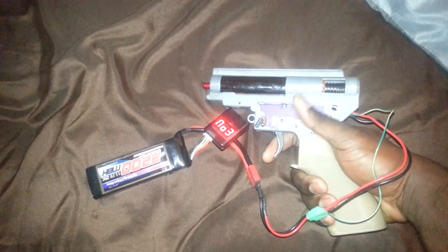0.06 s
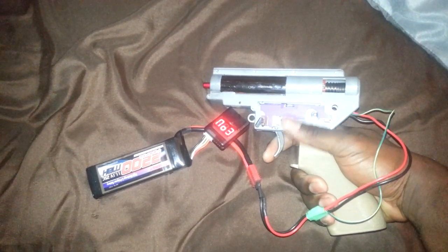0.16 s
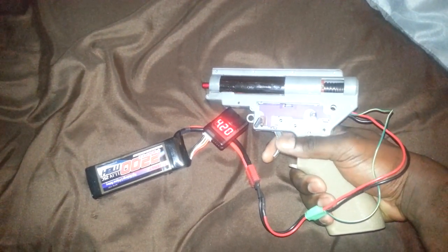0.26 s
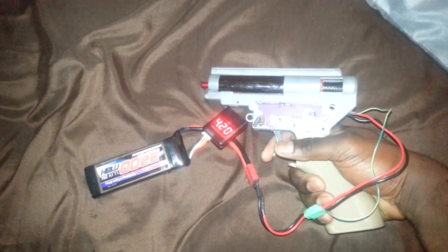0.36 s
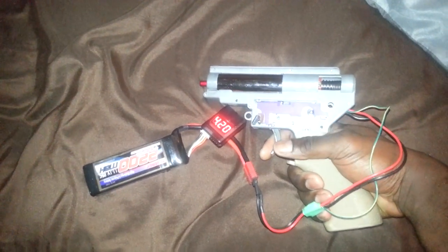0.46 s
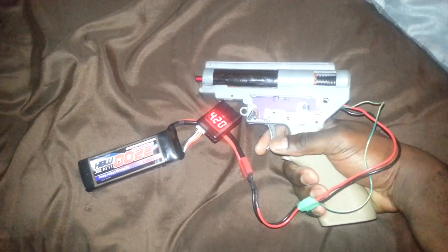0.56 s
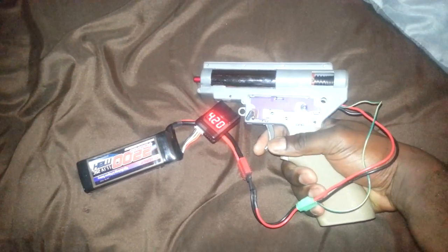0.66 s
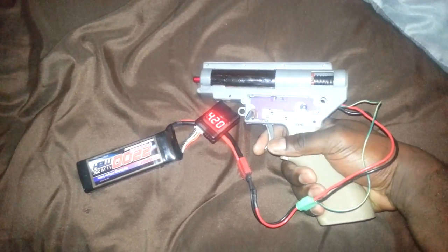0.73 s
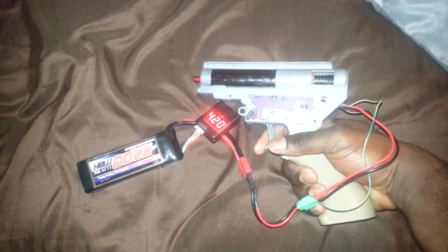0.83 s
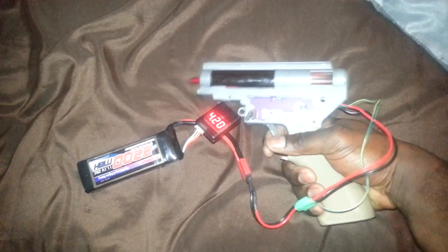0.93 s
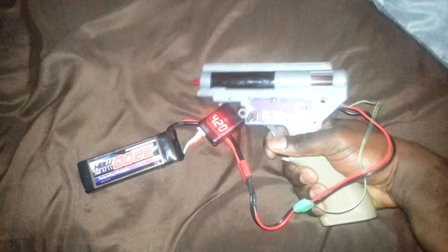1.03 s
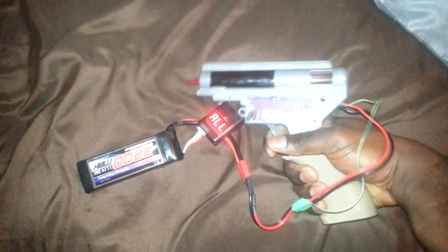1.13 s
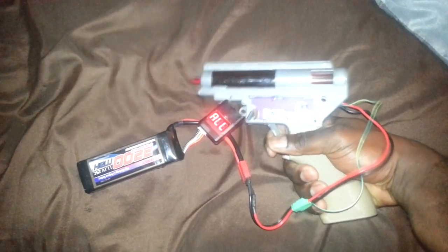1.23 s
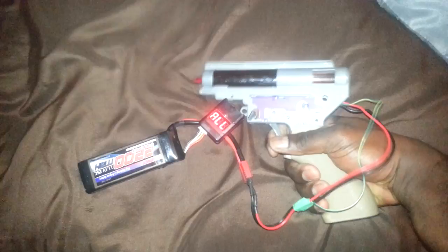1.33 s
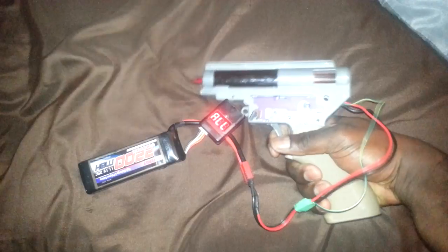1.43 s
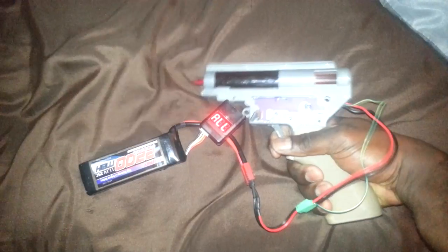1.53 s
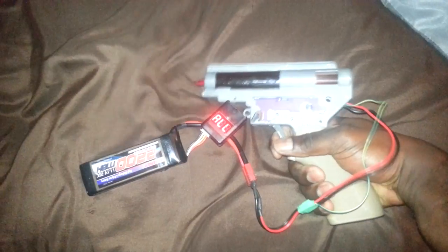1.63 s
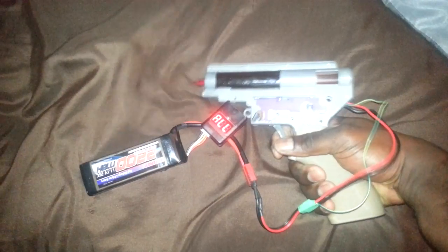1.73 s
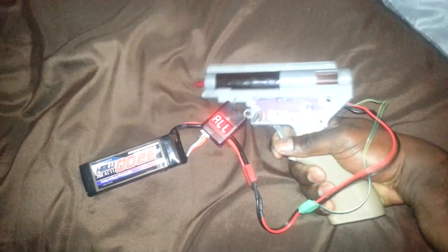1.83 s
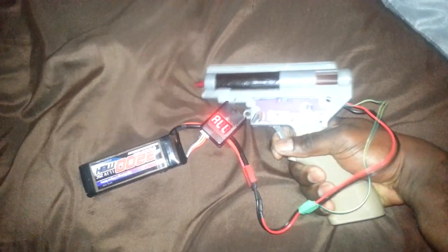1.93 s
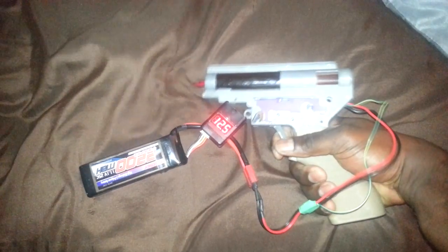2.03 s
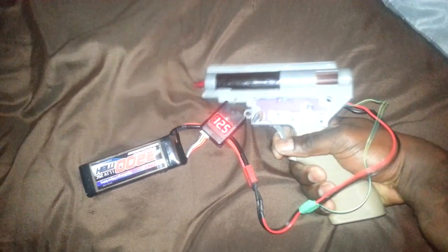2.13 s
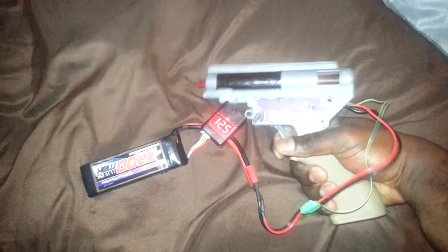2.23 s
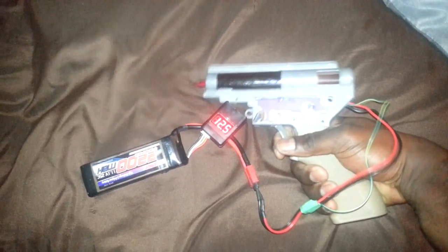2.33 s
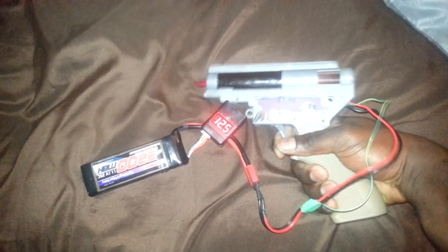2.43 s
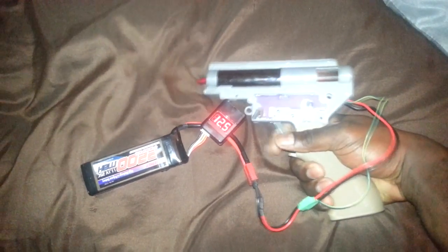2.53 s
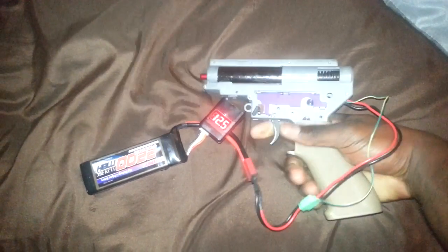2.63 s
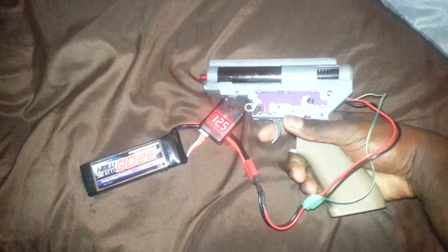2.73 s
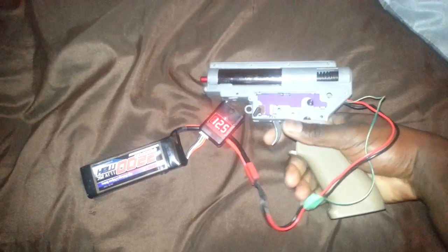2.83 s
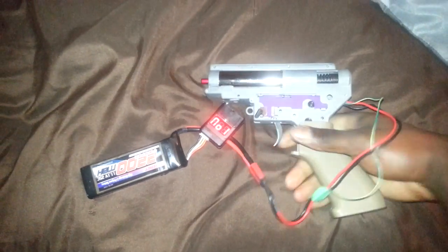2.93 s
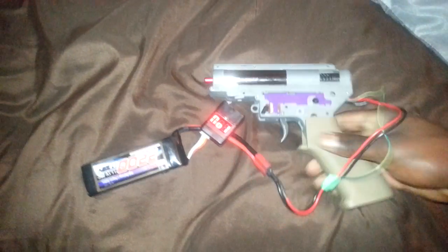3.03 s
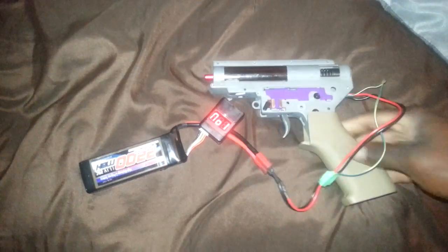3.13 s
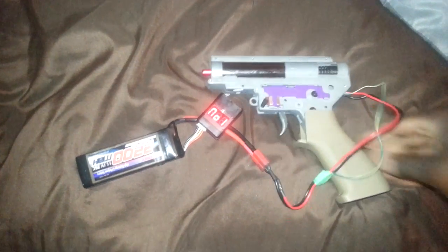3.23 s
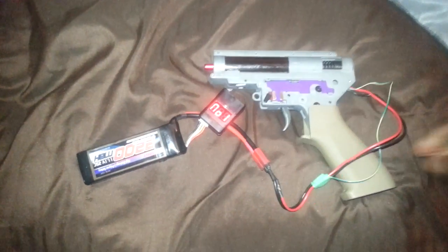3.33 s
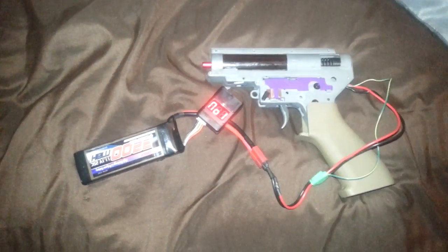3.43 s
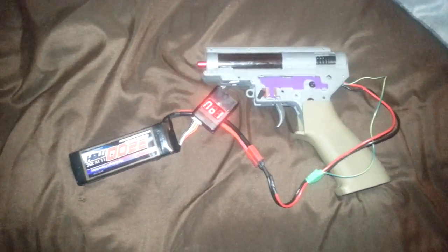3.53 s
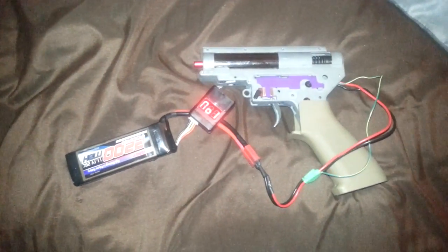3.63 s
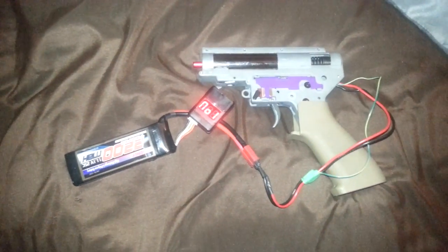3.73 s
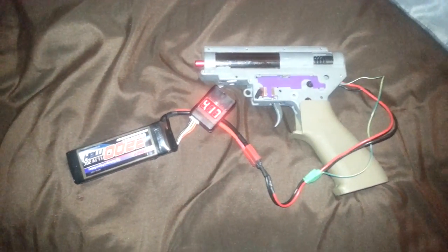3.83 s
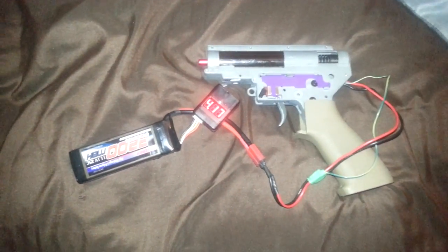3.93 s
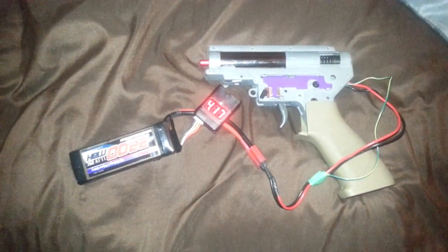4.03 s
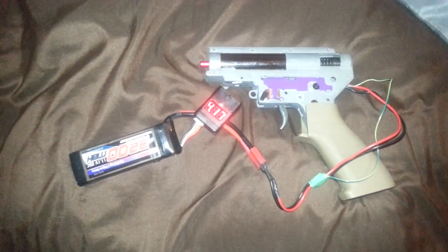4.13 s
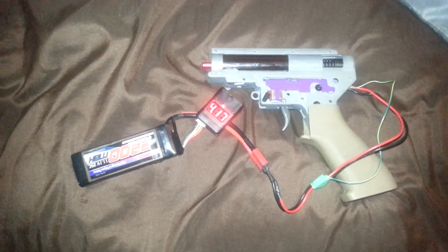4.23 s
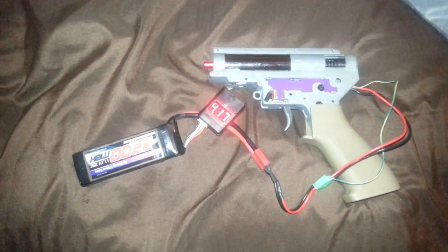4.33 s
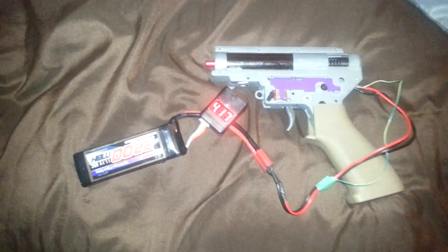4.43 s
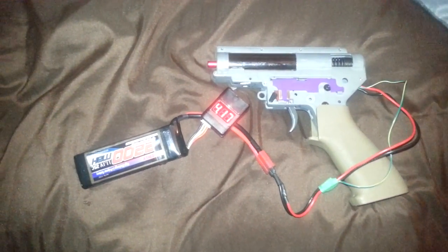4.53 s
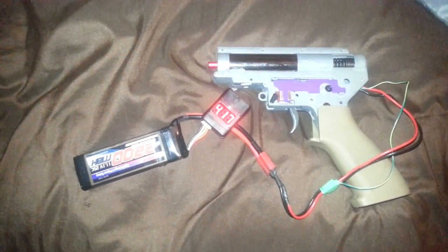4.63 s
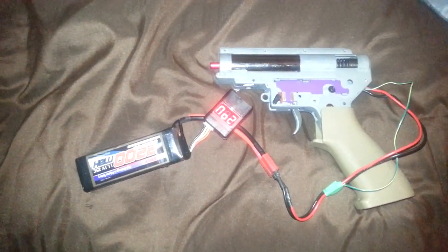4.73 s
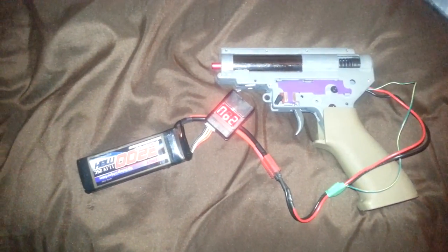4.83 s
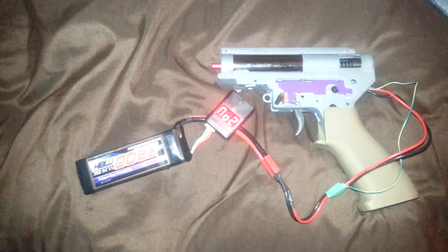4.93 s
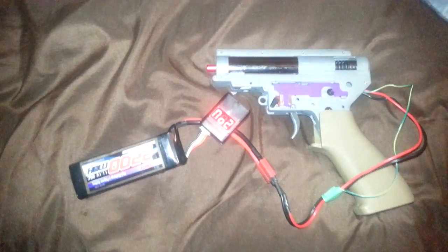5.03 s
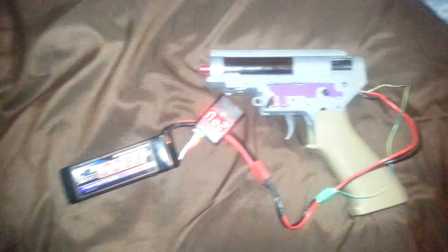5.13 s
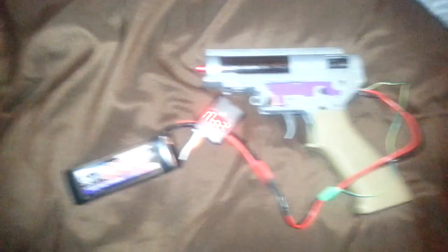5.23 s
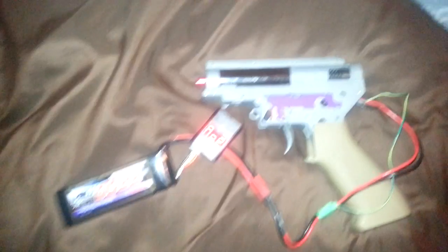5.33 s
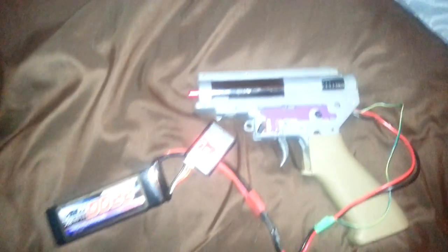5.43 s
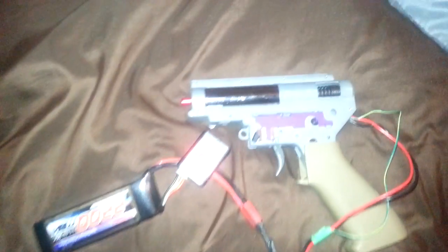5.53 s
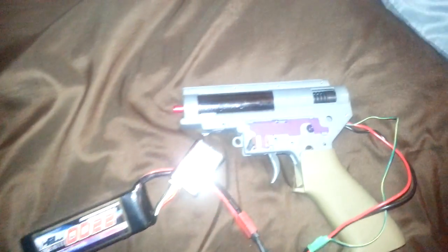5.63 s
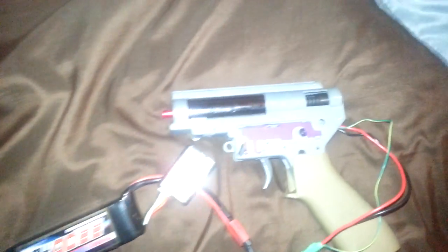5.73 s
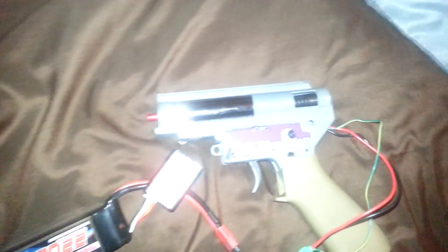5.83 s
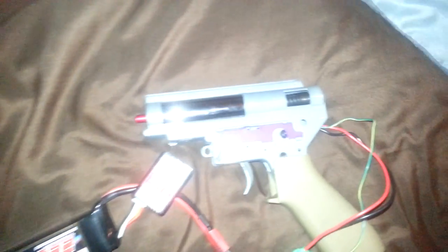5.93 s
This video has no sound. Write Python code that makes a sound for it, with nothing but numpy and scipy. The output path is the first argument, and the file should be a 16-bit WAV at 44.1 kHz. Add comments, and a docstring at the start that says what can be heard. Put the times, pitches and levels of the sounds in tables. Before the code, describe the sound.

Harsh rapid motor-and-piston chatter for under two seconds, overloading a close microphone, followed by faint hand friction and sharp handling clicks.

```python
"""Bedroom: a bare airsoft gearbox on the bed fires one dry burst, about 27 shots/s, overloading the microphone.
The motor surges, then grinds the gears round, slowly sagging; gear teeth and loose parts excite resonances.
Once a turn the piston slams and rings the metal shell; after power-off friction stops the gears.
A hand slides away over cloth (grainy hiss); later fingers rub and click on the camera by its microphones.
A steady noise floor and a soft low rush that comes and goes lie behind."""
import sys
import numpy as np
from scipy import signal
from scipy.fft import rfft, irfft, next_fast_len
from scipy.io import wavfile
from scipy.ndimage import uniform_filter1d

SR = 44100
rng = np.random.default_rng(int(sys.argv[2]) if len(sys.argv) > 2 else 0)


def to_wav(s):
    """Save 16-bit WAV."""
    ch = np.atleast_2d(s).T  # columns
    pcm = np.round(np.clip(ch, -1, 1) * 32767)  # PCM
    wavfile.write(sys.argv[1], SR, pcm.astype(np.int16))


N = 263409
TIME = np.arange(N) / SR


def from_db(db):
    """Decibels to gain."""
    return 10 ** (np.asarray(db) / 20)


def rms_one(x):
    """Scale to rms 1."""
    return x / np.sqrt(np.mean(x ** 2) + 1e-20)


def stereo_gain(left_db, right_db):
    """Column of left and right gains."""
    return from_db([[left_db], [right_db]])


def level(strokes):
    """Gain of overlapping strokes: linear rise, hold, exponential decay; powers add."""
    power = np.zeros(N)
    for start_s, attack_s, hold_s, release_s, level_db in strokes:
        age_s = TIME - start_s
        rise = np.clip(age_s / attack_s, 0, 1)
        decay = np.exp(-np.maximum(age_s - attack_s - hold_s, 0) / release_s)
        power += (from_db(level_db) * rise * decay) ** 2
    return np.sqrt(power)


def at_hz(points, hz):
    """Interpolate a table on a log-frequency axis."""
    table_hz, value = np.transpose(points)
    return np.interp(np.log(hz + 1), np.log(table_hz), value)


def cut(x, hz, kind, order=2):
    """Butterworth low- or high-pass."""
    sos = signal.butter(order, min(hz, .45 * SR), kind, fs=SR, output="sos")
    return signal.sosfilt(sos, x + 1e-18)


def ring(clicks, hz, t60_s):
    """Mode: a unit click starts a decaying sine of initial height 1."""
    radius = np.exp(-np.log(1000) / (t60_s * SR))
    angle = 2 * np.pi * hz / SR
    return signal.lfilter([0, np.sin(angle)], [1, -2 * radius * np.cos(angle), radius ** 2], clicks + 1e-18)


def resonate(x, hz, width_hz):
    """Resonance that keeps the power of white noise."""
    radius = np.exp(-np.pi * width_hz / SR)
    angle = 2 * np.pi * hz / SR
    gain = np.sqrt((1 - radius ** 2) / 2)
    return signal.lfilter(gain * np.array([1, 0, -1]), [1, -2 * radius * np.cos(angle), radius ** 2], x + 1e-18)


def strikes(times_s, sizes):
    """Train of single-sample clicks."""
    return np.bincount(np.round(np.asarray(times_s) * SR).astype(int), sizes, N)[:N]


def fade(clicks, decay_s):
    """Each click becomes an exponential envelope."""
    return signal.lfilter([1], [1, -np.exp(-1 / (decay_s * SR))], clicks + 1e-18)


# left-right correlation: freq_hz, correlation (0-1)
CORRELATION = [(40, 0.01), (150, 0.03), (500, 0.8), (1500, 0), (5000, .05)]


def noise(colour):
    """Coloured stereo noise, rms 1; a shared part gives each frequency its left-right correlation."""
    size = next_fast_len(N)
    hz = np.arange(size // 2 + 1) * SR / size
    shared, *own = rfft(rng.standard_normal((3, size)))
    alike = np.clip(at_hz(CORRELATION, hz), 0, 1)
    spectrum = np.sqrt(alike) * shared + np.sqrt(1 - alike) * np.array(own)
    return rms_one(irfft(spectrum * from_db(at_hz(colour, hz)), size)[:, :N])


# steady background spectrum: freq_hz, relative_level_db
FLOOR_COLOUR = [(30, -2.5), (60, -1), (105, 1), (170, -1.5), (230, -7.5), (690, -22), (1000, -20),
                (2000, -21.5), (5000, -26), (8000, -26.5), (13500, -22.5), (15000, -31.5)]


def floor(level_db):
    """Steady coloured noise of the room background."""
    return from_db(level_db) * noise(FLOOR_COLOUR)


# low rush swells: start_s, hold_s, level_db
RUSH_SWELLS = [(.36, 0.77, -62), (2.8, .35, -53.5), (3.85, 0.46, -58), (4.492, 0.32, -62.5),
               (5.3, 0.48, -59.5)]
# low rush spectrum: freq_hz, relative_level_db
RUSH_SPECTRUM = [(120, -17), (220, -4), (400, -1), (600, -8), (1000, -15.5), (2500, -20), (5000, -25),
                 (12000, -37.5)]
RUSH_ATTACK_S, RUSH_RELEASE_S, RUSH_REST_DB = .12, .2, -68


def rush():
    """Low noise swelling out of a faint resting level."""
    strokes = [(start_s, RUSH_ATTACK_S, hold_s, RUSH_RELEASE_S, level_db)
               for start_s, hold_s, level_db in RUSH_SWELLS]
    return np.hypot(level(strokes), from_db(RUSH_REST_DB)) * noise(RUSH_SPECTRUM)


def grainy_noise(strokes, colour, left_db, right_db, grain_db):
    """Shaped noise made grainy by fast level changes; friction slips in tiny steps like this."""
    grain = from_db(grain_db * rms_one(uniform_filter1d(rng.standard_normal(N), size=90)))
    return level(strokes) * rms_one(grain) * noise(colour) * stereo_gain(left_db, right_db)


# hand leaving over cloth: start_s, attack_s, hold_s, release_s, level_db (before channel trim)
CLOTH_STROKES = [(2.78, 0.12, 0.039, 0.2, -49.5), (3.02, 0.037, .012, 0.032, -49.5),
                 (3.14, 0.034, 0.0089, 0.052, -50)]
# cloth spectrum: freq_hz, relative_level_db
CLOTH_SPECTRUM = [(120, -31), (200, -10), (368, -4), (432, -16), (481, -12), (753, -10), (2550, -14),
                  (3650, -7.5), (5920, -17), (14500, -26)]


def cloth():
    """Hand slides away over the cloth in three grainy friction strokes."""
    return grainy_noise(CLOTH_STROKES, CLOTH_SPECTRUM, left_db=0.0, right_db=-0.5, grain_db=1.0)


# finger by left microphone: start_s, attack_s, hold_s, release_s, level_db (before channel trim)
SLIDE_STROKES = [(4.794, 0.015, 0.13, 0.04, -39.5)]
# slide spectrum: freq_hz, relative_level_db
SLIDE_SPECTRUM = [(180, -49), (300, -17), (353, -15), (415, -25), (450, -14), (480, -27), (512, -15),
                  (1880, -9.5), (3150, 1.5), (6340, -10), (14500, -18.5)]


def finger_slide():
    """Finger friction by the left microphone, smooth hiss."""
    return grainy_noise(SLIDE_STROKES, SLIDE_SPECTRUM, left_db=-0.5, right_db=-17, grain_db=0.0)


# finger by right microphone, light contact then three pushes:
# start_s, attack_s, hold_s, release_s, level_db (before channel trim)
SHIFT_STROKES = [(5.18, 0.032, 0.13, .02, -48), (5.254, 0.0093, 0.0036, 0.0086, -30.5),
                 (5.289, 0.007, .002, 0.0072, -33), (5.312, 0.0087, 0.0012, 0.0036, -26.5)]
# shift spectrum: freq_hz, relative_level_db
SHIFT_SPECTRUM = [(180, -60), (300, -14), (997, -12), (2140, -12), (3050, -4), (5940, -15.5), (7450, -15.5),
                  (14500, -22)]


def finger_shift():
    """Finger friction by the right microphone, slightly grainy."""
    return grainy_noise(SHIFT_STROKES, SHIFT_SPECTRUM, left_db=-5, right_db=-0.5, grain_db=-0.5)


# finger clicks on the camera: start_s, right_peak_db (before thud), ring_hz, scratch_decay_s, thud_re_peak_db
FINGER_CLICKS = [(5.1555, -34, 4200, .0004, -24), (5.164, -25, 3330, 0.00036, -25),
                 (5.203, -21, 3270, 0.0019, -34), (5.213, -34, 3400, .001, -14),
                 (5.243, -38, 3000, .001, 4), (5.2865, -3, 5000, 0.00055, -47),
                 (5.2974, -8, 4070, 0.00052, -42), (5.3146, -7.5, 2660, 0.001, -17.5),
                 (5.3231, -2, 3550, .0005, -25)]


def finger_clicks(left_db, width_hz, snap, thud_hz, dull_hz):
    """Each slip is a snap with a short scratch, ringing the camera case over a dull thud."""
    out = np.zeros((2, N))
    for start_s, peak_db, ring_hz, scratch_s, thud_db in FINGER_CLICKS:
        hit = strikes([start_s], [1.])
        drive = hit + 0.39 * fade(hit, scratch_s) * rng.standard_normal((2, N))
        bright = snap * cut(drive, ring_hz, "high")
        click = cut(resonate(drive, ring_hz, width_hz) + bright, dull_hz, "low")
        click /= np.abs(click).max(axis=1, keepdims=True)
        thud = from_db(thud_db) * ring(hit, thud_hz, 0.011)
        out += from_db(peak_db) * (click * stereo_gain(left_db, 0) + thud)
    return out


BED_T60_S = 0.6


def bedroom(x, wet_db, centre_hz, width_hz):
    """Reverb: decaying mid-band noise tail, different at each microphone."""
    t = TIME[:SR // 2]
    tail = rng.standard_normal((2, len(t))) * np.exp(-np.log(1000) * t / BED_T60_S) * (t > .008)
    tail = cut(resonate(tail, centre_hz, width_hz), centre_hz / 2, "high")
    tail /= np.sqrt(np.sum(tail ** 2, axis=1, keepdims=True))
    return from_db(wet_db) * signal.fftconvolve(x, tail, axes=1)[:, :N]


# low burst at motor start: start_s, attack_s, hold_s, release_s, level_db (before channel trim)
START_BURST = [(.969, 0.012, 0.039, .045, -21)]
# start burst spectrum: freq_hz, relative_level_db
START_BURST_SPECTRUM = [(30, 11), (100, -5.5), (400, 0), (900, 0.5), (1600, -14.5), (6000, -36)]


def start_burst():
    """One short burst of low noise as the motor starts."""
    return grainy_noise(START_BURST, START_BURST_SPECTRUM, left_db=0.0, right_db=-0.2, grain_db=0.5)


# load swells about every fourth turn
BEAT_HZ, BEAT_CREST_S = 6.44, 1.752


def load_beat(s):
    """Slow swing of the load on the motor, -1 to 1."""
    return np.cos(2 * np.pi * BEAT_HZ * (s - BEAT_CREST_S))


# one slam per turn of the sector gear; turns lengthen as the battery sags
FIRST_SLAM_S, TURN_S, SLOWING_S_PER_TURN, SHOT_COUNT = 1.0065, .037066, .00002003, 44
SLAM_SURGE_DB, SLAM_SETTLE_S, SLAM_BEAT_DB, SLAM_GROWTH_DB_PER_S = 6, .07, 1.25, 0.67


def shots():
    """Slam times (s) and strengths (dB): start surge, swing with the load, slow growth."""
    turn = np.arange(SHOT_COUNT)
    s = FIRST_SLAM_S + TURN_S * turn + SLOWING_S_PER_TURN * turn ** 2 / 2
    surge_db = SLAM_SURGE_DB * np.exp(-(s - FIRST_SLAM_S) / SLAM_SETTLE_S)
    growth_db = SLAM_GROWTH_DB_PER_S * (s - s.mean())
    return s, surge_db + SLAM_BEAT_DB * load_beat(s) + growth_db


POWER_OFF_S, COAST_S = 2.66, .28


def coasting():
    """Share of running speed: 1 under power, then friction brakes it linearly to rest."""
    return np.clip(1 - (TIME - POWER_OFF_S) / COAST_S, 0, 1)


START_S, BITE_DB, SURGE_DB = .9705, 1, 12
SURGE_RISE_S, SURGE_SETTLE_S, TOOTH_BEAT_DB, FORCE_EXPONENT = .025, 0.13, 1.47, 0.94


def effort():
    """Tooth force: switch-on surge, steady run with load swing, then a power of the falling speed."""
    age_s = np.maximum(TIME - START_S, 0)
    climb_db = BITE_DB + (SURGE_DB - BITE_DB) * age_s / SURGE_RISE_S
    settle_db = SURGE_DB * np.exp(-(age_s - SURGE_RISE_S) / SURGE_SETTLE_S)
    surge_db = np.where(age_s < SURGE_RISE_S, climb_db, settle_db)
    return from_db(surge_db + TOOTH_BEAT_DB * load_beat(TIME)) * coasting() ** FORCE_EXPONENT


def gear_turns():
    """Sector gear angle in turns: one per shot, then coasting to rest."""
    s, _ = shots()
    turns_per_s = np.interp(TIME, (s[1:] + s[:-1]) / 2, 1 / np.diff(s)) * coasting()
    turns = np.cumsum(turns_per_s) / SR
    return turns - np.interp(s[0], TIME, turns)


def nozzle(puff_db, puff_hz, crack_db, crack_hz, crack_s):
    """Escaping air: a bright noise crack and a soft low puff, both growing faster than the stroke."""
    s, strength_db = shots()
    crack_envelope = fade(strikes(s - .0004, from_db(1.4 * strength_db + crack_db)), crack_s)
    crack = crack_envelope * cut(rng.standard_normal((2, N)), crack_hz, "high")
    puff_envelope = fade(strikes(s, from_db(2 * strength_db + puff_db)), 0.012)
    puff = puff_envelope * rms_one(cut(rng.standard_normal((2, N)), puff_hz, "low"))
    return crack + puff


# chatter per turn (impact, piston rebound, its settling, tappet):
# mean_delay_s after the slam, mean_relative_level_db, decay_s
TURN_RATTLES = [(0.0, 7, 0.0016), (.0074, 2, 0.0037), (0.0138, -8.5, .004), (0.0283, -5, .0016)]


def rattle(extra_decay_s):
    """Envelope of loose parts chattering each turn, plus extra when tooth force tops its steady level."""
    s, _ = shots()
    force = np.interp(s, TIME, effort())
    out = np.zeros(N)
    for delay_s, rattle_db, decay_s in TURN_RATTLES:
        when_s = s + delay_s * (1 + rng.normal(0, .012, len(s)))
        size = from_db(rattle_db + rng.normal(0, 1.3, len(s)))
        out += fade(strikes(when_s, size), decay_s)
    extra = np.maximum(force - 1, 0)   # most in the start surge
    return out + fade(strikes(s, extra), extra_decay_s)


def flutter(depth_db, size=300):
    """The load on the teeth wavers within hundredths of a second; gain with rms depth in dB."""
    return from_db(depth_db * rms_one(uniform_filter1d(rng.standard_normal(N), size=size)))


# gear and motor resonances: freq_hz, width_hz, left_relative_db, right_relative_db
GEAR_RESONANCES = [(450, 180, -37.5, -38.5), (680, 150, -33.5, -37.5), (1046, 320, -27, -28),
                   (1657, 120, -29, -21.5), (1955, 92, -29.5, -27), (2154, 210, -33.5, -24),
                   (2570, 320, -31, -29), (3130, 530, -24, -41), (3800, 600, -27, -28),
                   (4630, 620, -29, -21.5), (5500, 600, -29.5, -43), (7580, 730, -29, -37.5),
                   (9570, 2000, -32.5, -29), (13300, 920, -33, -31)]


def gears(turns, gear_db, rattle_db, grain_db, throb_db, dulling, count=172):
    """Tooth knocks, part lasting wear and part chance, and chatter drive resonances; the motor throbs."""
    tooth = np.floor(turns * count).astype(int)
    at = np.flatnonzero(np.diff(tooth))
    force = effort()
    motor_turns = turns * count / 10   # ten teeth on the pinion
    throb = from_db(gear_db + throb_db * np.sin(2 * np.pi * motor_turns))
    slack = coasting() ** FORCE_EXPONENT
    chatter = from_db(rattle_db) * rattle(extra_decay_s=.008)
    grain = rms_one(from_db(grain_db * rng.standard_normal(len(at))))
    spacing = np.sqrt(np.median(np.diff(at)))
    out = np.zeros((2, N))
    for hz, width_hz, left_db, right_db in GEAR_RESONANCES:
        repeat = .6 / (1 + (hz / 3000) ** 2)   # share of power that repeats every turn
        worn = rng.standard_normal((2, count))[:, tooth[at] % count]
        chance = rng.standard_normal((2, len(at)))
        knocks = np.zeros((2, N))
        knocks[:, at] = spacing * grain * (np.sqrt(repeat) * worn + np.sqrt(1 - repeat) * chance)
        # coasting teeth touch softly and ring mostly the middle modes
        softness = slack ** (dulling * abs(np.log2(hz / 850)))
        drive = force * throb * softness * knocks + chatter * rng.standard_normal((2, N))
        blend = np.arcsin(np.clip(at_hz(CORRELATION, hz), 0, 1)) / 2   # sets left-right correlation
        drive = np.cos(blend) * drive + np.sin(blend) * drive[::-1]
        out += stereo_gain(left_db, right_db) * resonate(drive, hz, width_hz)
    return out * (TIME > START_S)


def impact(left_db, right_db, knock_hz, t60_s):
    """Piston head meets the cylinder end: one steep, dead knock per shot."""
    s, strength_db = shots()
    return stereo_gain(left_db, right_db) * ring(strikes(s, from_db(1.5 * strength_db)), knock_hz, t60_s)


# shell modes: freq_hz, t60_s, left_relative_db, right_relative_db
SHELL_MODES = [(209, .026, -16, -19), (264, 0.039, -18, -23), (427, .055, -16, -20),
               (520.5, 0.054, -20, -25), (698.4, 0.062, -16.5, -18.5), (750.2, 0.085, -14, -16.5),
               (916, 0.046, -10, -7), (1053, 0.1, -19, -23), (1157, 0.087, -17, -9),
               (1458, 0.061, -32.5, -15.5), (1577, 0.096, -20, -14), (1735, 0.012, -13, -4.5),
               (1927, 0.034, -24, -17), (1944, 0.0058, -10, -6.5), (2620, 0.04, -20, -14),
               (3050, 0.0027, -15.5, -13), (4454, 0.0044, -6.5, -12.5)]
RING_LEAD_S = .00058   # the shell ring starts about half a millisecond before the knock


def piston(slam_db, rebound_db, low_hz):
    """Each slam and its quick rebound ring the shell; neighbouring modes swing in opposite senses."""
    s, strength_db = shots()
    ring_start_s = s - RING_LEAD_S
    rebound_s, scatter_db = .00473, .7
    out = np.zeros((2, N))
    for k, (hz, t60_s, left_db, right_db) in enumerate(SHELL_MODES):
        scatter = scatter_db * rng.standard_normal((2, len(s)))
        slam, rebound = from_db(strength_db + slam_db + scatter)
        blows = strikes(ring_start_s, slam) + from_db(rebound_db) * strikes(ring_start_s + rebound_s, rebound)
        out += (-1) ** k * stereo_gain(left_db, right_db) * ring(blows, hz, t60_s)
    return cut(cut(out, low_hz, "high"), low_hz, "high")   # a small body radiates little bass


def scene():
    """Background, handling, and the gearbox with its room tail."""
    background = floor(level_db=-57.0) + rush()
    hands = cloth() + finger_slide() + finger_shift()
    hands += finger_clicks(left_db=-11, width_hz=2300, snap=0.95, thud_hz=515, dull_hz=10600)
    gun = start_burst()
    gun += nozzle(puff_db=-46, puff_hz=110, crack_db=-7.5, crack_hz=3970, crack_s=0.0013)
    gear_noise = gears(gear_turns(), gear_db=-1.5, rattle_db=5.5, grain_db=1.5, throb_db=0.5, dulling=0.36)
    gun += flutter(depth_db=1.7) * gear_noise
    gun += cut(impact(left_db=0, right_db=3, knock_hz=1700, t60_s=.005), 800, "high")
    gun += piston(slam_db=-0.74, rebound_db=-11.5, low_hz=150)
    return gun + bedroom(gun, wet_db=-23.0, centre_hz=923.7, width_hz=700) + hands + background


CUTOFF_HZ = 14800


def record(dry):
    """Input overload saturates the slams; then rumble and top are cut."""
    ceiling = .98
    clipped = dry / (1 + (dry / ceiling) ** 8) ** (1 / 8)
    thinned = cut(clipped, 49, "high")
    return signal.sosfilt(signal.ellip(10, .1, 80, CUTOFF_HZ, fs=SR, output="sos"), thinned)


dry = scene()
out = record(dry)
to_wav(out)
```